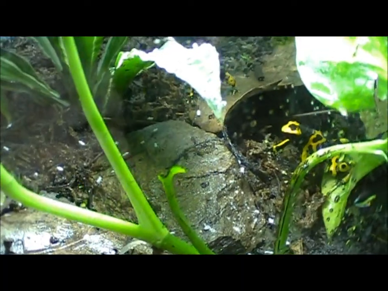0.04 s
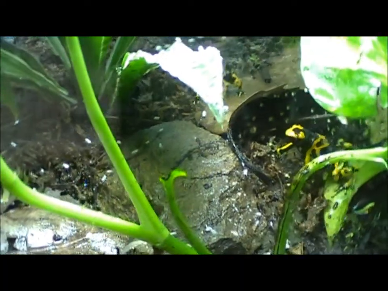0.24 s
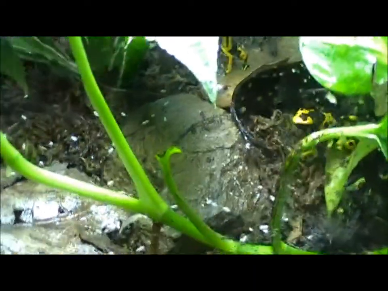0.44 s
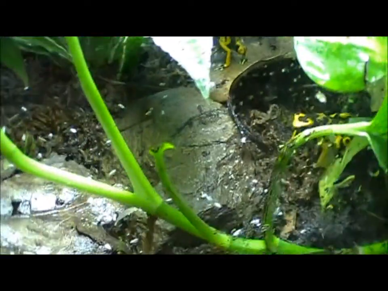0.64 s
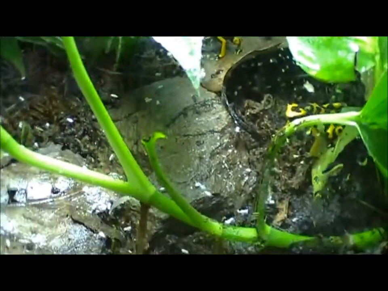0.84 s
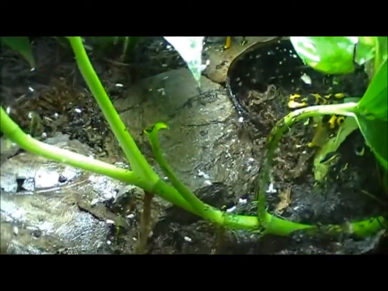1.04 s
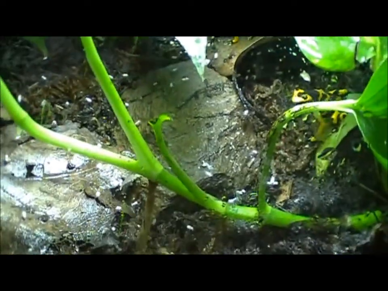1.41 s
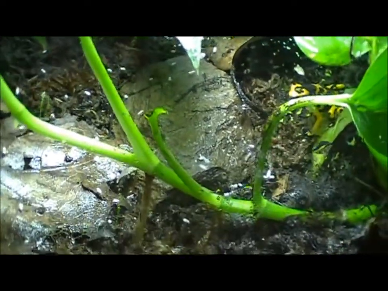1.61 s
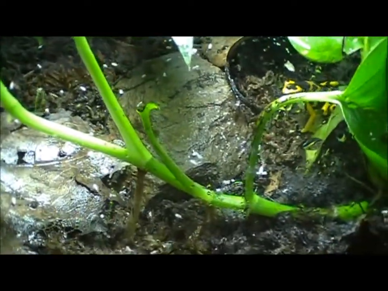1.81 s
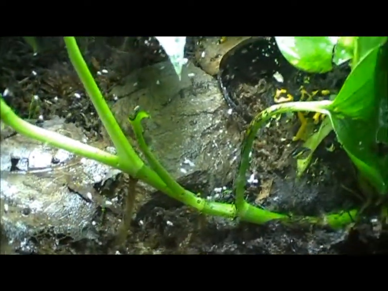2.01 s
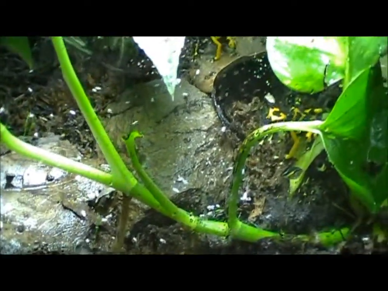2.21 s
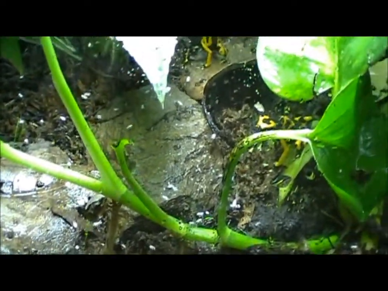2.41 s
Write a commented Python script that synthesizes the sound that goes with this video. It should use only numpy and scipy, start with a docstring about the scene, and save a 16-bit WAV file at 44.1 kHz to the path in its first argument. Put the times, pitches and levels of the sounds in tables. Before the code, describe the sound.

A short, airy rustle swells close to the microphone, then a small plastic part snaps with a sharp click. Faint handling ticks follow over steady hiss and a low motor hum in a quiet room beside a terrarium.

```python
"""Even hiss and a faint motor hum in a quiet room beside a terrarium, on a hand-held mono microphone.
Something brushes past close to the microphone: dense tiny slips make one swelling, high rustle.
Then a small plastic part snaps and rings briefly, a sharp click with a short tail in the room.
Two tiny handling ticks and a soft scuff follow."""
import sys
import numpy as np
from scipy import signal
from scipy.fft import rfft, irfft
from scipy.io import wavfile

SR = 44100
rng = np.random.default_rng(int(sys.argv[2]) if len(sys.argv) > 2 else 0)


def digitize_waveform(pressure):
    """Quantize a signal to 16-bit integers and store it at the path in sys.argv[1].

    Rows of a 2-D input are taken as channels; values are limited to [-1, 1].
    """
    field = np.atleast_2d(pressure).T
    bounded = np.clip(field, -1, 1)
    quanta = np.round(bounded * 32767).astype(np.int16)
    wavfile.write(sys.argv[1], SR, quanta)


N = 112454
TIME = np.arange(N) / SR


def from_db(db):
    """Decibels to gain."""
    return 10 ** (np.asarray(db) / 20)


def rms_one(x):
    """Scale to unit power."""
    return x / np.sqrt(np.mean(x ** 2) + 1e-20)


def level_curve(rows):
    """Gain along rows of (seconds, dB), silent outside them."""
    return from_db(np.interp(TIME, *np.transpose(rows), left=-150, right=-150))


def colour(x, spectrum):
    """Shape a steady excitation by rows of (Hz, relative dB); rms 1."""
    hz, db = np.transpose(spectrum)
    bins = np.maximum(np.fft.rfftfreq(N, 1 / SR), 1)
    gain = from_db(np.interp(np.log(bins), np.log(hz), db))
    return rms_one(irfft(rfft(x) * gain, N))


def noise(spectrum):
    """Coloured noise; rms 1."""
    return colour(rng.standard_normal(N), spectrum)


def resonate(x, hz, width_hz):
    """Pass a steady excitation through one steep-sided resonance; rms 1."""
    bins = np.fft.rfftfreq(N, 1 / SR)
    return rms_one(irfft(rfft(x) / (1 + 1j * (bins - hz) / width_hz) ** 2, N))


def burst(start, attack, t60):
    """Envelope with a quick rise and an exponential fall of 60 dB in t60 seconds."""
    age = np.maximum(TIME - start, 0)
    return np.minimum(age / attack, 1) * from_db(-np.minimum(60 * age / t60, 200))


def room_hiss():
    """The quiet room all around: a broad hiss whose level barely drifts."""
    # Colour of the hiss. Each row: frequency in Hz, relative density in dB.
    spectrum = [(30, -28), (60, -22), (100, -17), (135, -14.5), (170, -4), (200, -8.5), (300, 0), (390, -2),
                (650, -1.5), (920, 0.5), (1300, -2), (1900, -2), (2400, -4.5), (5000, -7), (11000, -10.5),
                (14000, -14.5), (16000, -17.5)]
    # Slow drift. Each row: time in seconds, level offset in dB.
    drift = [(0, -.3), (.7, 0.1), (1.4, -.3), (1.9, 0), (2.3, -0.1), (2.55, 0)]
    level_db = -49.5 + np.interp(TIME, *np.transpose(drift))
    return from_db(level_db) * noise(spectrum)


def motor_hum():
    """A faint motor under the hiss: its partials waver and slowly trade level."""
    # Hum lines. Each row: frequency in Hz, base rms level in dB, multiple of the swing added to it.
    partials = [(156.6, -75.5, -0.15), (237, -72, -0.84), (315.3, -71, 1.2), (940, -77.5, -0.12),
                (1534, -74, 0.21), (7850, -75, -0.31)]
    # Slow swing of the partials. Each row: time in seconds, swing in dB.
    swing = [(0, 7), (.28, 5), (.5, 1), (.85, -0.5), (1.3, -4.5), (1.95, -1.5), (2.45, 5.5)]
    swing_db = np.interp(TIME, *np.transpose(swing))
    hum = np.zeros(N)
    for hz, db, share in partials:
        steady = np.sqrt(2) * np.sin(2 * np.pi * (hz * TIME + rng.random()))
        waver = 0.4 * resonate(rng.standard_normal(N), hz, width_hz=7.1)
        hum += from_db(db + share * swing_db) * (steady + waver)
    return hum


def handling_ticks():
    """Light touches just above the hiss: two short ticks and a longer scuff."""
    # The touches. Each row: start in seconds, level in dB, time to fall 60 dB in seconds.
    touches = [(.630, -42.5, .02), (1.017, -43.5, 0.038), (2.447, -38.5, 0.085)]
    # Colour of a touch. Each row: frequency in Hz, relative density in dB.
    spectrum = [(200, -25), (600, -4), (950, 13.5), (1400, 1), (2100, -1), (4500, -8), (12000, -5),
                (16000, -16)]
    envelope = sum(from_db(db) * burst(start, attack=0.003, t60=t60) for start, db, t60 in touches)
    return noise(spectrum) * envelope


def slips(per_second=18000, spread_db=3.5):
    """Friction as dense tiny slips of uneven size."""
    sizes = from_db(spread_db * np.minimum(rng.exponential(1, N), 5))
    signs = rng.choice([-1, 1], N)
    return sizes * signs * (rng.random(N) < per_second / SR)


def rustle():
    """One airy brush close to the microphone; two high resonances join as the pressure grows."""
    # Pressure of the stroke. Each row: time in seconds, level in dB.
    stroke = [(.175, -60), (.212, -46.5), (.24, -46.5), (.28, -39), (.308, -34.5), (.316, -30),
              (.35, -30.5), (.375, -32), (.394, -33), (.402, -39), (.412, -60)]
    # Broad, high colour of the friction. Each row: frequency in Hz, relative density in dB.
    friction = [(5000, -37), (8000, -9), (10000, -2), (11500, -3.5), (13500, -5), (16000, -14.5)]
    # Resonances the slips excite. Each row: frequency in Hz, width in Hz, dB against the stroke's peak.
    squeaks = [(10360, 250, -7), (11860, 300, -5)]
    # Lower body, heard under firm pressure. Each row: frequency in Hz, relative density in dB.
    body_spectrum = [(150, -29), (350, -11), (580, 2), (1100, -5.5), (2000, -1.5), (2380, 4.5), (2700, -3),
                     (3250, 3), (4700, -1), (5350, 2), (6200, -4.5), (7200, 1.5), (10000, -16.5)]
    # Swell of that body. Each row: time in seconds, level in dB.
    body_level = [(.18, -70), (.21, -55), (.26, -51), (.305, -43.5), (.322, -37), (.338, -38), (.35, -42.5),
                  (.38, -42), (.405, -56), (.413, -72)]
    # Faint sizzle that lingers after the stroke. Each row: time in seconds, level in dB.
    sizzle_level = [(.15, -75), (.3, -59), (.55, -57), (.74, -64), (.79, -69), (.825, -56.5), (.9, -72)]
    level = level_curve(stroke)
    pressure = level / level.max()
    air = pressure * from_db(-4) * colour(slips(), friction)
    resonances = sum(from_db(db) * resonate(slips(), hz, width) for hz, width, db in squeaks)
    squeak = pressure ** 1.46 * resonances  # grows faster than the airy part
    body = level_curve(body_level) * colour(slips(), body_spectrum)
    sizzle = level_curve(sizzle_level) * noise(friction)
    return level.max() * (air + squeak) + body + sizzle


def plastic_click(contact_s=0.00049, low_cut_hz=320):
    """A snap rings a small plastic part's modes, with a crack on top and a short tail in the room."""
    # The snap. Each row: start in seconds, gain in dB.
    snaps = [(0.5625, -18.5)]
    # The part's modes. Each row: frequency in Hz, relative level in dB, time to fall 60 dB in seconds.
    modes = [(700, -18.5, 0.033), (960, -10.5, 0.056), (1070, -13, .065), (1497, -4.5, 0.019),
             (1770, -1, 0.013), (1986, -3.5, 0.02), (2350, -5, 0.028), (2770, -9, 0.023), (3713, 0, 0.014),
             (4050, -6, 0.016), (4530, 2, 0.0059), (5100, -5, 0.0047), (6500, -15, 0.0098),
             (7700, -24, 0.009), (9200, -13, 0.0089)]
    # Crack of the contact. Each row: frequency in Hz, relative density in dB.
    crack_spectrum = [(500, -18), (1500, -1), (4500, -3), (6000, -9), (9200, -7.5), (11500, -13.5),
                      (13000, -27), (16000, -38)]
    # The room's duller answer. Each row: frequency in Hz, relative density in dB.
    tail_spectrum = [(300, -15), (1000, 1), (2300, -3), (4000, -5), (5500, -20), (12000, -21)]
    clicks = np.zeros(N)
    for start, db in snaps:
        ring = np.zeros(N)
        for k, (hz, mode_db, t60) in enumerate(modes):
            tone = (-1) ** k * np.sin(2 * np.pi * hz * (TIME - start))  # modes alternate in sign
            ring += from_db(mode_db) * burst(start, contact_s, t60) * tone
        crack = from_db(-4) * burst(start, contact_s, t60=0.013) * noise(crack_spectrum)
        tail = from_db(-19) * burst(start, contact_s, t60=0.11) * noise(tail_spectrum)
        clicks += from_db(db) * (ring + crack + tail)
    low_cut = signal.butter(2, low_cut_hz, "high", fs=SR, output="sos")
    return signal.sosfilt(low_cut, clicks)


def scene():
    """All sources at one microphone, the same in both channels."""
    mono = room_hiss() + motor_hum() + rustle() + plastic_click() + handling_ticks()
    return np.tile(mono, (2, 1))


def record(dry):
    """The microphone chain cuts the highest treble steeply."""
    cutoff_hz = 15850
    high_cut = signal.ellip(12, 0.1, 70, cutoff_hz, fs=SR, output="sos")
    return signal.sosfilt(high_cut, dry)


dry = scene()
out = record(dry)
digitize_waveform(out)
```